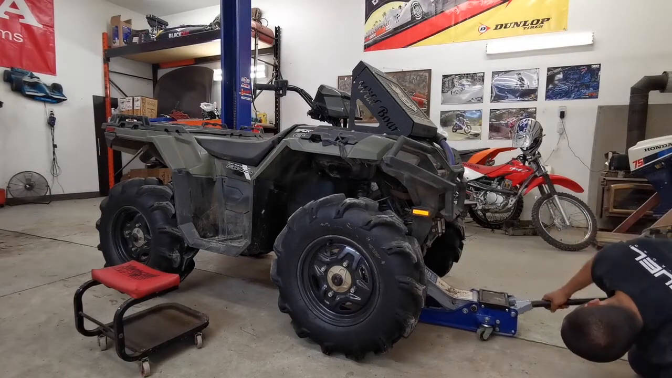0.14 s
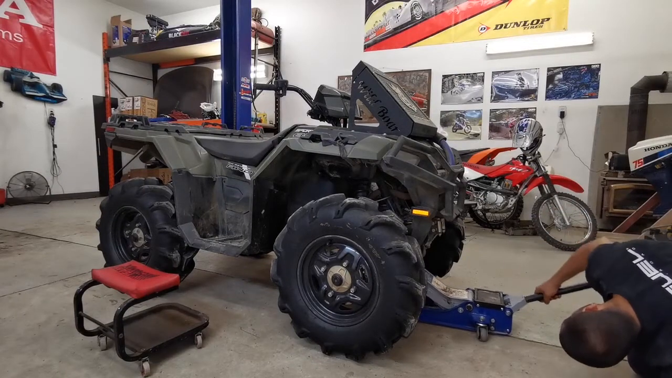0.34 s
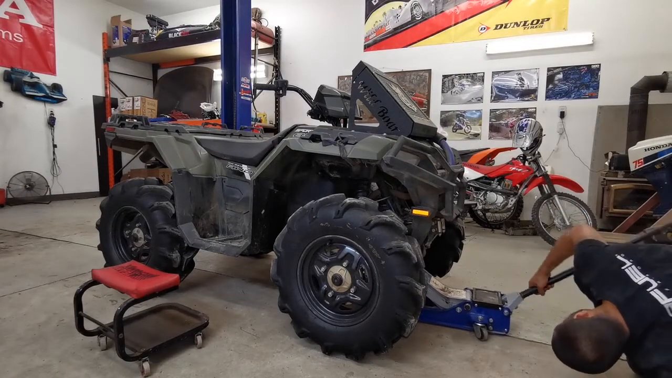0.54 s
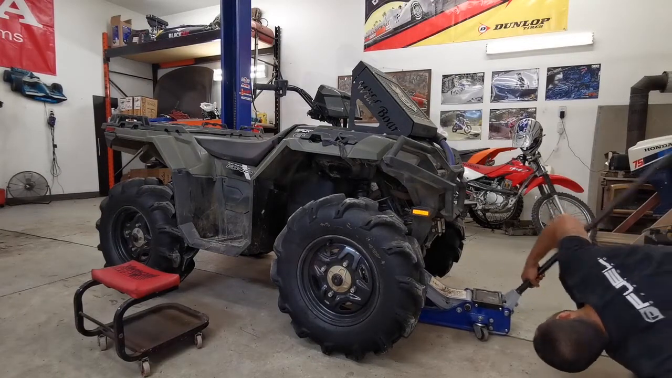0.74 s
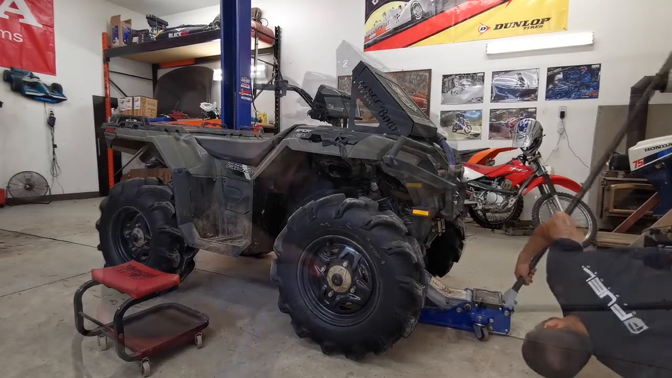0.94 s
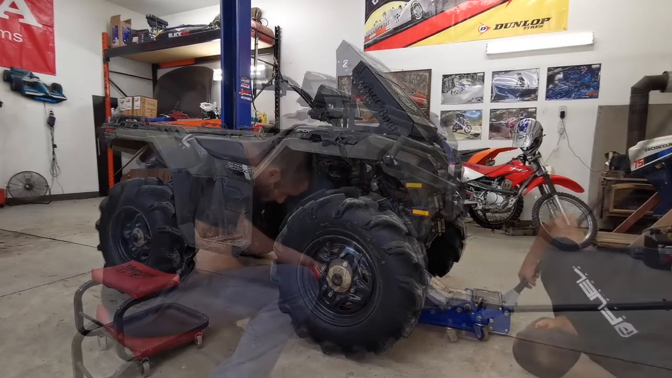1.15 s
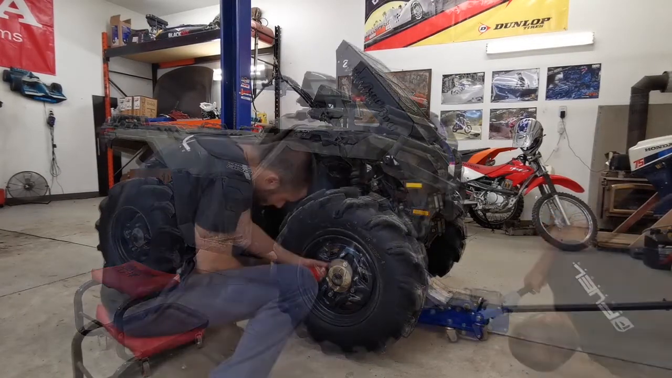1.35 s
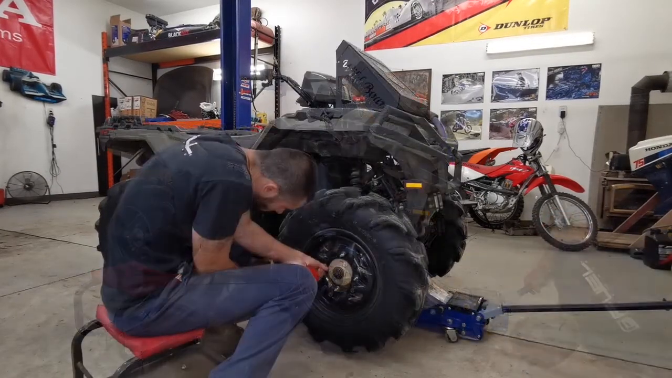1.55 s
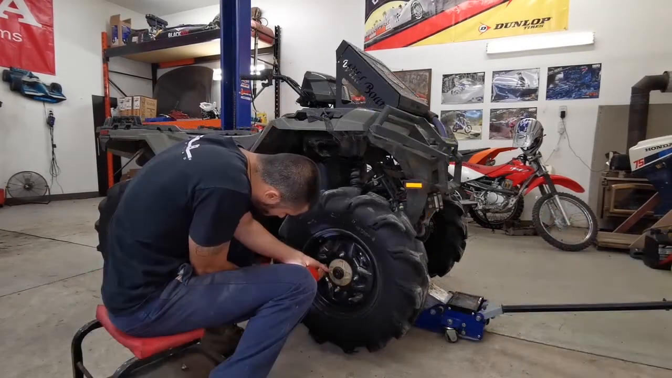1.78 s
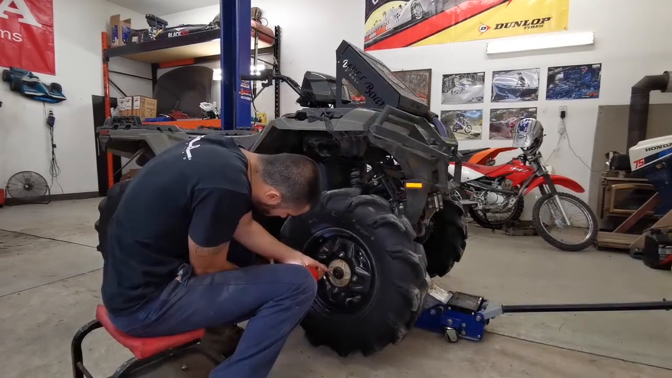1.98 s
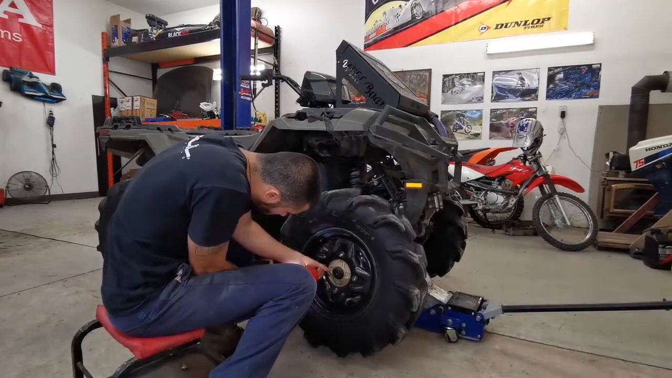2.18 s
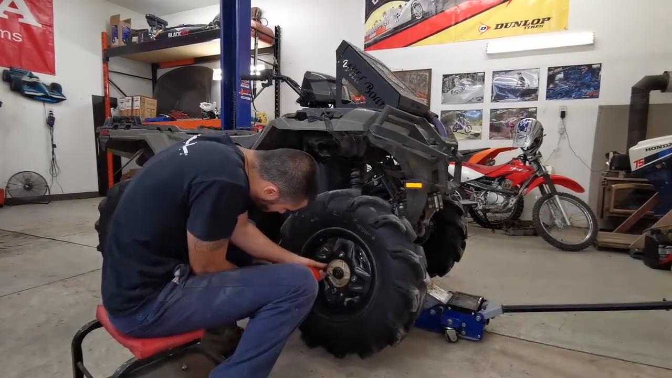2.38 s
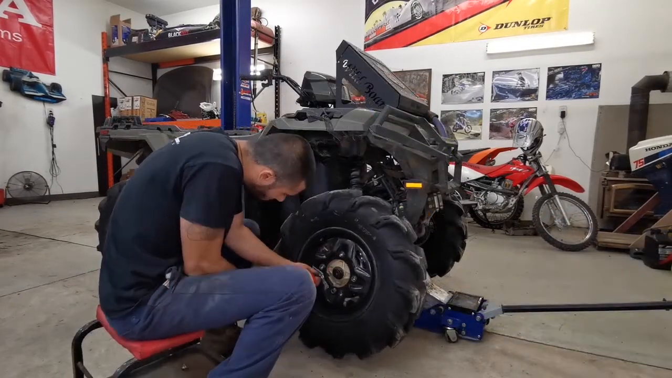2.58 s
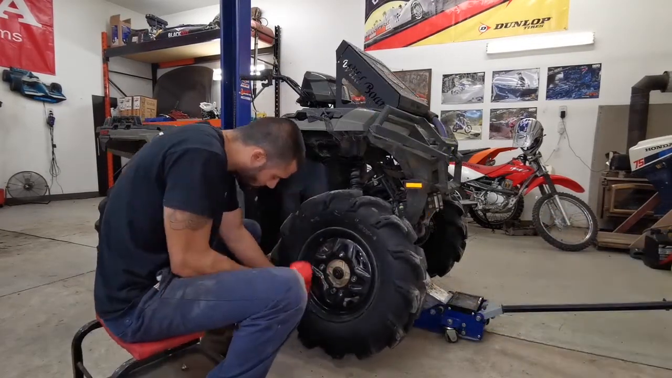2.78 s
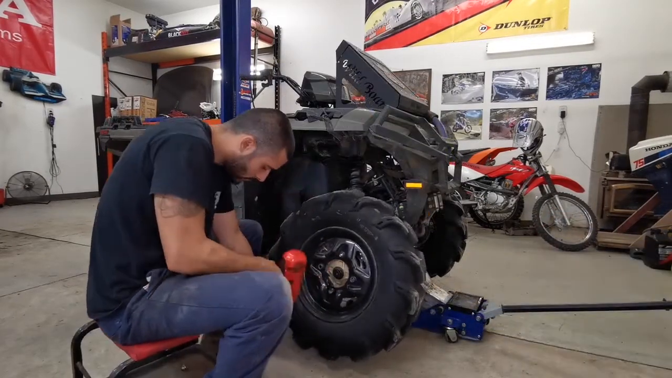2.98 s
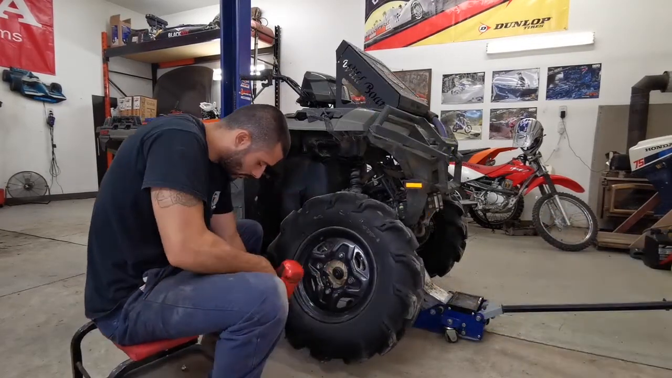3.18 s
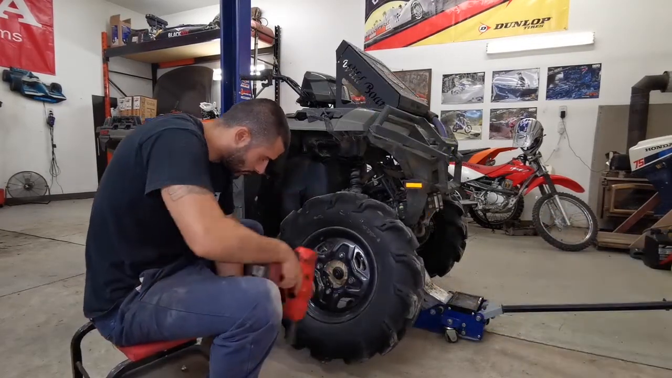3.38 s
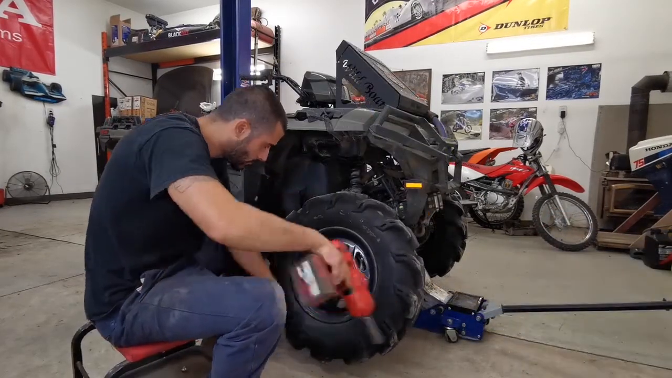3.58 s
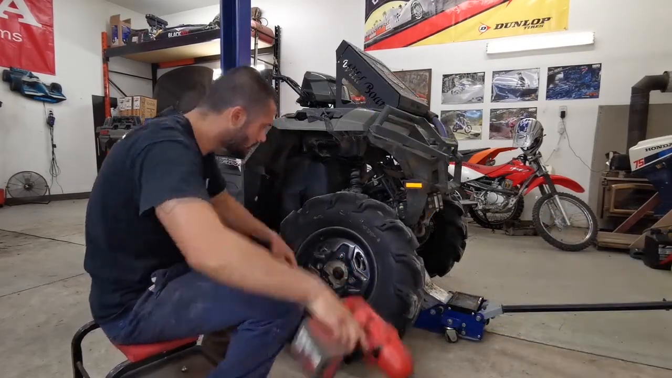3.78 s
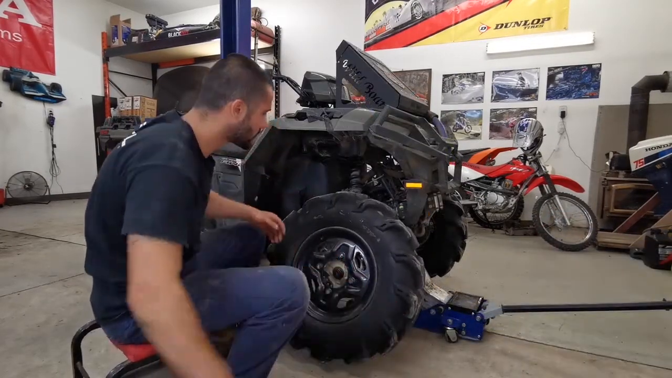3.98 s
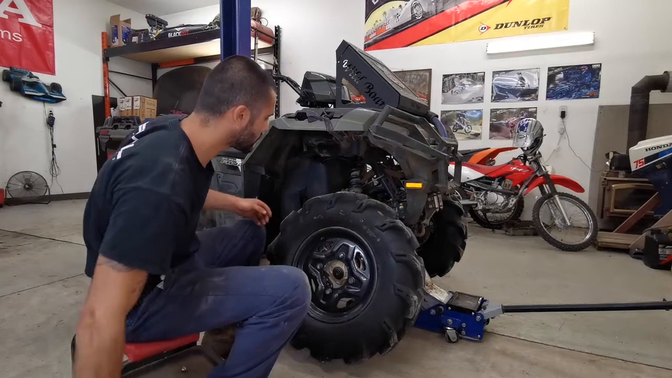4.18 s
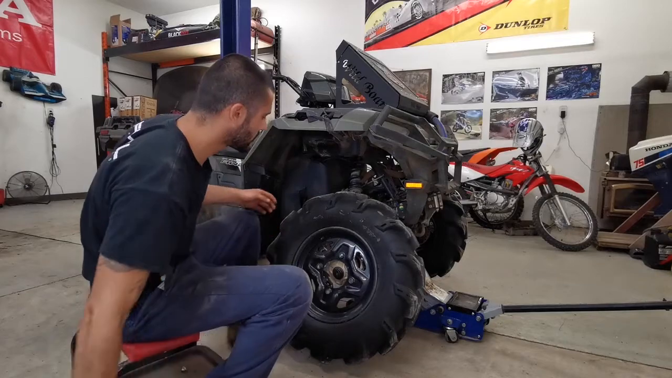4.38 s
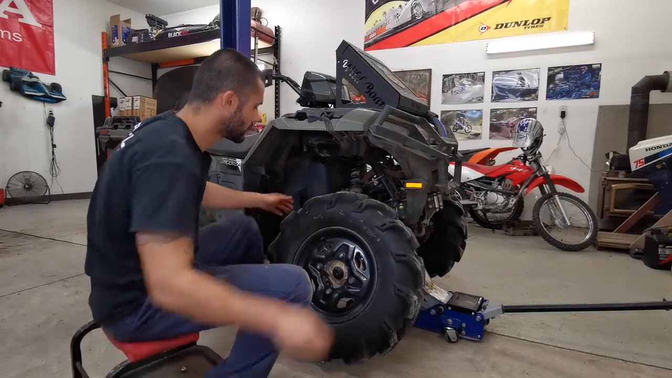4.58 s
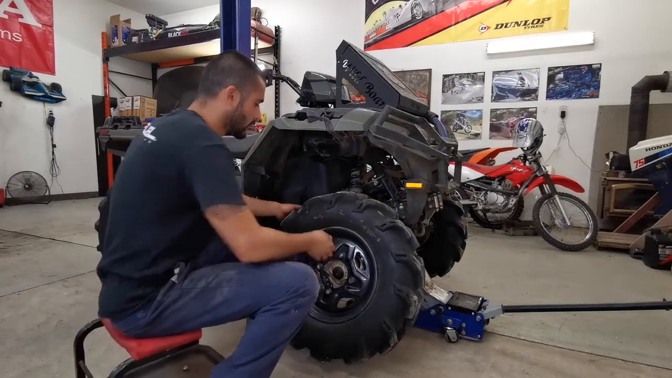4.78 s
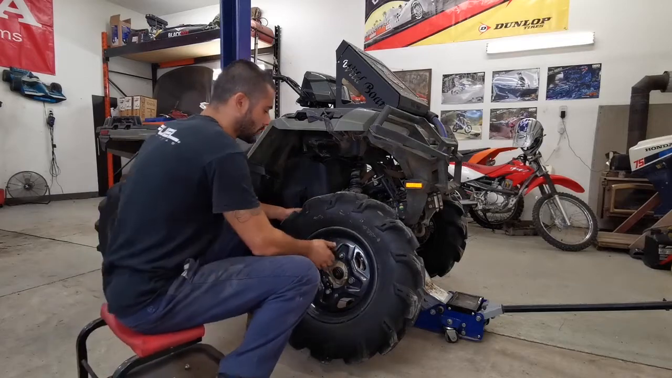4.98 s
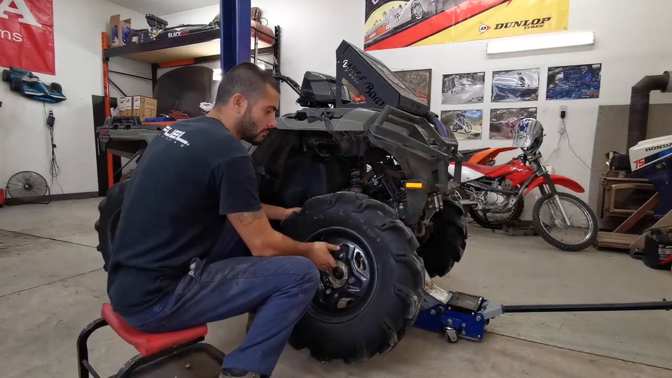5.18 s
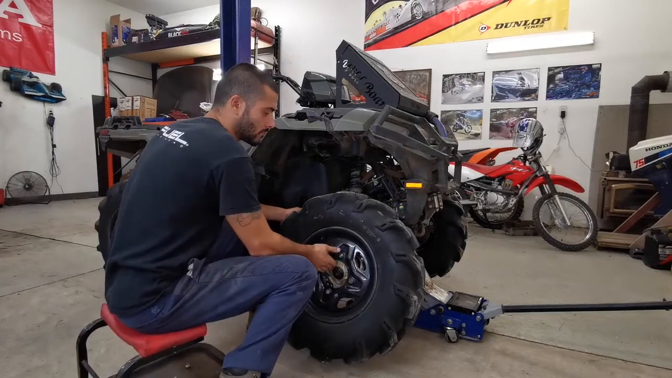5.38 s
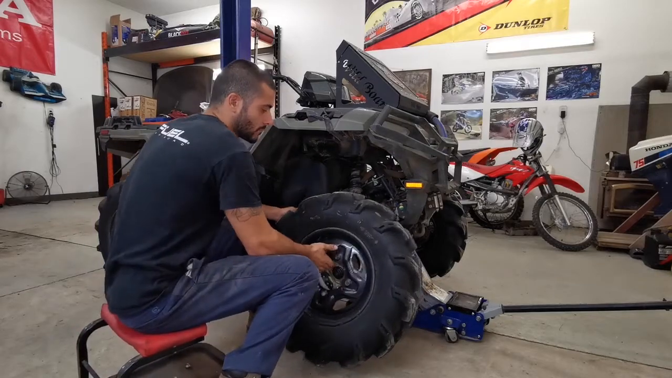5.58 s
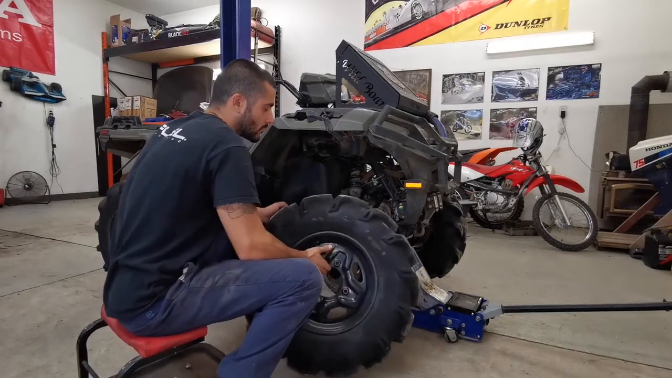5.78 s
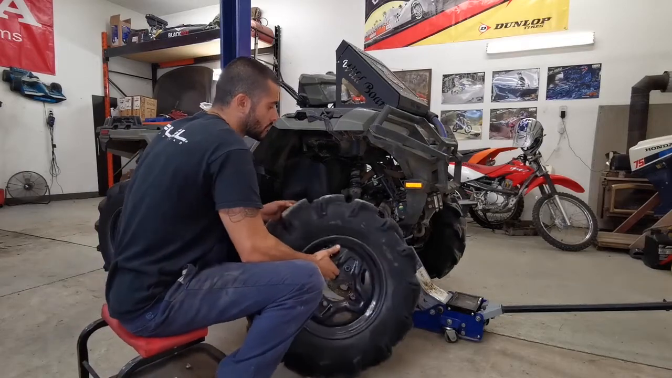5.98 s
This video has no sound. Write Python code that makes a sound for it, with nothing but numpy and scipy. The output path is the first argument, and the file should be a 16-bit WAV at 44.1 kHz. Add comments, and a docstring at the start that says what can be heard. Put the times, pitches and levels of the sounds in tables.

```python
"""A hard-walled garage, with work on a quad bike's wheel. A floor jack's steel handle clanks, rings and
slides home. An impact wrench hammers a lug nut loose and spins it off, motor and gears whining. Socket
and nuts click, the tool is put down, and the wheel is dragged off its studs with a hollow tyre boom.
Each hit is a chatter of contact coloured by the body it strikes; each scrape is catching friction.
A low hum lies underneath, with the shuffling and low thumps of someone moving about."""
import sys
import numpy as np
from scipy import signal
from scipy.fft import rfft, irfft, next_fast_len
from scipy.io import wavfile

SR = 44100
rng = np.random.default_rng(int(sys.argv[2]) if len(sys.argv) > 2 else 0)


def store_wav(level_fs):
    """Save 16-bit WAV to argv[1]."""
    pcm = np.round(np.clip(np.atleast_2d(level_fs), -1, 1) * 32767)
    wavfile.write(sys.argv[1], SR, pcm.T.astype(np.int16))


N = 266584
TIME = np.arange(N) / SR


def gain_of(db):
    """Decibels to amplitude."""
    return 10 ** (np.asarray(db) / 20)


def unit_rms(x):
    """Normalises to an rms of one."""
    return x / np.sqrt(np.mean(x ** 2) + 1e-20)


def curve_at(points, hz):
    """Reads a curve along a log-frequency axis."""
    f, value = np.transpose(points)
    return np.interp(np.log(hz + 1), np.log(f + 1), value)


def add(mix, s, sound):
    """Mixes a sound in at time s."""
    part = mix[..., max(round(s * SR), 0):][..., :sound.shape[-1]]
    part += sound[..., :part.shape[-1]]


def waver(n, per_s):
    """Smooth random modulation of about unit size."""
    knots = rng.standard_normal(int(n / SR * per_s) + 2)
    return np.interp(np.arange(n) / SR * per_s, np.arange(len(knots)), knots)


def routing(direct_db):
    """Gains for a source's two feeds: (direct sound, reverb send at unity)."""
    return gain_of([[direct_db], [0]])


def colour(x, eq, tilt_db=0, size=2048):
    """Minimum-phase EQ, tilted by tilt_db per octave, with its peak at unity."""
    hz = np.fft.rfftfreq(size, 1 / SR)
    db = curve_at(eq, hz) + tilt_db * np.log2(np.maximum(hz, 70))
    log_gain = np.log(gain_of(np.maximum(db - db.max(), -100)))
    log_response = np.conj(signal.hilbert(np.r_[log_gain, log_gain[-2:0:-1]]))
    taps = np.fft.ifft(np.exp(log_response)).real
    return signal.oaconvolve(x, taps)[:len(x)]


def hits(cues, eq, direct_db, modes=(), ring_db=0, ring_direct_db=0):
    """Brief chatters of contact through a body, whose modes, if given, ring on."""
    length_s = max([t60 / 2 for _, _, t60 in modes] + [.15])
    out, t = np.zeros((2, N)), np.arange(int(length_s * SR)) / SR
    ring = sum(gain_of(db - 60 * t / t60) * np.exp(2j * np.pi * (hz * t + rng.random()))
               for hz, db, t60 in modes)
    push = 1. * (t == 0)  # the room blurs the chatter into a single push
    scale = np.sqrt(.01 * SR / len(t))  # level counts the energy as if spread over 10 ms
    for s, db, contact_s, tilt_db in cues:
        envelope = np.exp(-np.minimum(t / contact_s, 50)) * (1 - np.exp(-8 * t / contact_s))
        chatter = rng.choice([-1., 1.], len(t)) * envelope
        hit = routing(direct_db) * [unit_rms(colour(force, eq, tilt_db)) for force in (chatter, push)]
        if modes:
            rung = (ring * np.exp(2j * np.pi * rng.random())).real * np.tanh(t / contact_s)
            hit += routing(ring_direct_db) * gain_of(ring_db) * unit_rms(rung)
        add(out, s, gain_of(db) * scale * hit)
    return out


def scrape(eq, start_s, end_s, db, fade_db_per_s, tilt_db, direct_db, rough_db, catches_per_s=70):
    """A part catches and slips as it slides, ever more lightly."""
    out, t = np.zeros((2, N)), np.arange(0, end_s - start_s, 1 / SR)
    catches = gain_of(rough_db * waver(len(t), catches_per_s))
    friction = unit_rms(colour(rng.standard_normal(len(t)) * catches, eq, tilt_db))
    edge_fades = np.clip(np.minimum(t, t[::-1]) / .006, 0, 1)
    add(out, start_s, routing(direct_db) * gain_of(db - fade_db_per_s * t) * edge_fades * friction)
    return out


# Stereo image (f/Hz, left-right correlation)
CORRELATION = [(30, 0.92), (150, 0.96), (300, 0.88), (600, 0.64), (1200, 0), (16000, 0.047)]


def narrow_bass(x):
    """Makes two unrelated channels alike in the bass, as at two close microphones."""
    size = next_fast_len(x.shape[1], real=True)
    left, other = rfft(x, size)
    shared = np.clip(curve_at(CORRELATION, np.fft.rfftfreq(size, 1 / SR)), 0, 1)
    right = shared * left + np.sqrt(1 - shared ** 2) * other
    return irfft(np.array([left, right]), size)[:, :x.shape[1]]


# The bed: room tone EQ, shuffle EQ and hum lines (f/Hz, relative level/dB)
AIR_EQ = [(20, -7.5), (60, -8.5), (100, -16), (170, 0.5), (250, -7.5), (600, -8.5), (1400, -16.5),
          (2400, -12.5), (3300, -21.5), (6000, -24), (8200, -35), (10600, -28), (12500, -40.5),
          (16000, -41)]
SHUFFLE_EQ = [(20, -24), (50, -4), (110, -4), (170, -4.5), (240, -1), (400, -10), (1000, -5.5),
              (4000, -18.5), (16000, -63)]
HUM_LINES = [(118, -60.5), (157, -74), (237, -58.5), (314, -62.5), (464, -64)]


def room_bed(air_db=-48, hum_trim_db=-2, shuffle_db=-54, unrest_db=3, unrest_per_s=18):
    """Room tone with a wavering hum, and the low uneven shuffle of someone at work."""
    def stereo_noise(eq):
        channels = np.array([colour(rng.standard_normal(N), eq, size=8192) for _ in "LR"])
        return unit_rms(narrow_bass(channels))

    air, shuffle = stereo_noise(AIR_EQ), stereo_noise(SHUFFLE_EQ)
    hum = sum(gain_of(db) * np.sqrt(2) * np.sin(2 * np.pi * hz * TIME + .5 * waver(N, 5.9))
              for hz, db in HUM_LINES)
    shuffle *= gain_of(shuffle_db + unrest_db * waver(N, unrest_per_s))
    return gain_of(air_db) * air + gain_of(hum_trim_db) * hum + shuffle


# Jack cues: pivot clacks and handle clank (t/s, level/dB, contact/s, tilt/dB per octave)
PIVOT_CLACKS = [(0.3180, -26, 0.002, 0.5), (0.3890, -23, 0.0051, 10)]
HANDLE_CLANK = [(0.3925, -21, 0.0087, -1.5)]
# Body tone of pivot and handle (f/Hz, level/dB)
PIVOT_EQ = [(180, -49), (300, -30), (455, -1), (667, -21), (1040, 2.5), (1280, -17), (1900, -1.5),
            (2570, -10.5), (4300, -5), (6850, -21), (7690, -35), (10900, -32.5), (16000, -68)]
HANDLE_EQ = [(88, -26), (150, -30), (197, -27), (231, -10), (270, -33.5), (466, -15), (675, -10.5),
             (1450, -6.5), (1630, -4.5), (1790, 0), (3490, -12), (5050, -14), (10800, -34), (16000, -61)]
# Long ring of the steel handle (f/Hz, level/dB, t60/s)
HANDLE_MODES = [(237, -20, 1.5), (464, -2, .4), (604, -6, .7), (942, -5, .4), (1438, 1, .8), (1715, -4, .4),
                (1805, -3, .8), (1841, -5, .8), (2133, -6, .4), (2364, -2, 1.2), (2583, -6, .4),
                (2972, -9, .7), (4210, -8, .6), (4667, -8, .6), (4936, -7, .55)]


def floor_jack():
    """The pivot clacks, then the steel handle clanks, rings and slides home."""
    clacks = hits(PIVOT_CLACKS, PIVOT_EQ, direct_db=-13)
    clank = hits(HANDLE_CLANK, HANDLE_EQ, direct_db=-5.5,
                 modes=HANDLE_MODES, ring_db=-10.5, ring_direct_db=12)
    slide = scrape(HANDLE_EQ, start_s=.405, end_s=.76, db=-36, fade_db_per_s=37,
                   tilt_db=-1.4, direct_db=1.5, rough_db=6.5)
    return clacks + clank + slide


# Lug nut cues (t/s, level/dB, contact/s, tilt/dB per octave)
NUT_CLINKS = [(1.356, -43.5, 0.0028, -2), (1.3765, -39.5, 0.0018, -2), (1.4784, -32.5, 0.0023, -3.5),
              (1.5158, -41.5, 0.0015, -0.5), (4.4290, -32.5, 0.0024, -.5), (4.7715, -37.5, 0.0029, 5),
              (4.7758, -23.5, 0.00069, 0.7), (5.773, -55, 0.0021, 5)]
# Nut on rim: attack tone (f/Hz, level/dB) and ring (f/Hz, level/dB, t60/s)
NUT_EQ = [(120, -49), (200, -24), (316, -1), (401, -31.5), (509, -21), (623, -4.5), (1060, -9.5), (2800, 3),
          (4600, -9), (8580, -16), (10900, -13.5), (12200, -26), (14900, -24), (16000, -24)]
NUT_MODES = [(421, -3.5, 0.12), (2030, 2, 0.081), (2305, -0.5, 0.17), (2600, 0, 0.15), (2750, -12, 0.19)]


def lug_nuts():
    """Lug nuts clink against the rim with a short ring."""
    return hits(NUT_CLINKS, NUT_EQ, direct_db=-6, modes=NUT_MODES, ring_db=-8.5, ring_direct_db=-3)


# Low thumps of someone moving about (2.8 to 3.28 s), and bumps on the wheel
# (t/s, level/dB, contact/s, tilt/dB per octave)
THUMPS_AND_BUMPS = [(1.472, -45, 0.0047, -8), (2.80, -36.5, 0.052, -6.5), (2.878, -42, 0.0055, 4),
                    (3.28, -35, 0.029, -4), (5.775, -33.5, 0.01, -3.5), (5.881, -22, 0.01, 0.5)]
# Wheel tone (f/Hz, level/dB) and tyre boom (f/Hz, level/dB, t60/s); the thumps share both
WHEEL_EQ = [(29, -51), (50, -17.5), (189, -4), (353, -6), (398, -14), (678, -6), (884, -9.5), (1540, -18.5),
            (2440, -11), (2750, -20), (6390, -24), (8340, -31.5), (10600, -26.5), (16000, -55.5)]
TYRE_MODES = [(156, 11, 0.14), (220, -7, 0.54), (266, -6, .25), (323, 9, 0.25)]


def thumps_and_wheel():
    """Low thumps of someone moving about, wheel bumps with a hollow tyre boom, rim dragging on studs."""
    low_hits = hits(THUMPS_AND_BUMPS, WHEEL_EQ, direct_db=-4.5,
                    modes=TYRE_MODES, ring_db=-5.5, ring_direct_db=-10)
    drag = scrape(WHEEL_EQ, start_s=5.892, end_s=6.05, db=-30.5, fade_db_per_s=54,
                  tilt_db=-.5, direct_db=-.5, rough_db=5)
    return low_hits + drag


# Wrench timing: trigger pulled, nut loose, nut off the thread, trigger let go
TRIGGER_S, LOOSE_S, FREE_S, RELEASE_S = 1.78, 1.97, 2.24, 2.63


def run_envelope(threaded_db, free_db, fade_db_per_s, attack_s=.045, freeing_s=.018):
    """A wrench voice opens on the trigger, steps up as the nut comes free and dies after release."""
    attack = np.clip((TIME - TRIGGER_S) / attack_s, 0, 1)
    free = np.clip((TIME - FREE_S) / freeing_s + .5, 0, 1)
    fade_db = fade_db_per_s * np.maximum(TIME - RELEASE_S, 0)
    return attack * gain_of(threaded_db + (free_db - threaded_db) * free - fade_db)


# Motor and gear partials (multiple of the whine pitch, level/dB, flutter as a share of pitch)
WHINE_PARTIALS = [(.547, -7, .018), (1, 0, .004), (1.52, -11, .005), (2, -7, .003), (2.52, -9, .01),
                  (3, -14, .004), (4, -9, .005)]
# Rasp of gears and rattling nut (f/Hz, level/dB)
RASP_EQ = [(200, -29), (1000, -16.5), (1500, -13.5), (2500, -13), (4000, -11), (5200, -14), (6700, -11),
           (8300, -22), (10700, -11), (12500, -30), (15000, -45)]


def wrench_spin(motor_hz=2600, creep_hz_per_s=130, sag_hz=250, spin_up_s=.085, strain_db=8,
                wobble_share=.00187, wobble_db=3, wobble_per_s=32):
    """Motor and gears whine up as the load falls away; the loose nut rattles in the wobbling socket."""
    loose_for_s = np.maximum(TIME - LOOSE_S, 0)
    load = np.exp(-loose_for_s / spin_up_s)
    pitch_hz = motor_hz + creep_hz_per_s * loose_for_s - sag_hz * load
    pitch_hz *= 1 + wobble_share * waver(N, wobble_per_s)
    motor = run_envelope(threaded_db=-35, free_db=-29, fade_db_per_s=140)
    gears = run_envelope(threaded_db=-41, free_db=-38.5, fade_db_per_s=115)
    whine = np.zeros(N)
    for multiple, db, flutter in WHINE_PARTIALS:
        level = gain_of(db + wobble_db * waver(N, wobble_per_s)) * (motor if multiple == 1 else gears)
        hz = multiple * pitch_hz * (1 + flutter * waver(N, per_s=250))
        whine += (1 - load) * level * np.sin(2 * np.pi * np.cumsum(hz) / SR)
    strain = load * np.clip((TIME - TRIGGER_S) / (LOOSE_S - TRIGGER_S), 0, 1)  # peaks as the nut gives
    rattle = rng.standard_normal(N) * np.exp(.47 * waver(N, per_s=150))
    rasp = unit_rms(colour(rattle, RASP_EQ)) * gain_of(strain_db * strain)
    rasp *= run_envelope(threaded_db=-35.5, free_db=-33, fade_db_per_s=190)
    return routing(direct_db=7) * whine + routing(direct_db=-4) * rasp


# Socket cues (t/s, level/dB, contact/s, tilt/dB per octave) and body tone (f/Hz, level/dB)
SOCKET_CLICKS = [(1.783, -31, 0.002, -3), (1.832, -14.5, 0.004, 0.5), (2.600, -25.5, .014, 1.5),
                 (2.882, -32, 0.0031, 0.5), (2.9068, -16.5, 0.001, 6), (3.3388, -17.5, 0.00036, 5),
                 (3.3412, -20.5, 0.002, 9), (3.408, -38, .004, -5)]
SOCKET_EQ = [(70, -39), (180, -13), (300, 8), (519, -30), (584, -2.5), (774, -1), (961, 4.5), (1660, 2),
             (2400, 6.5), (2980, -1.5), (6740, -9), (8360, -16.5), (10600, -6), (14000, -24.5),
             (16000, -19.5)]


def socket():
    """The socket clicks on nut and stud."""
    return hits(SOCKET_CLICKS, SOCKET_EQ, direct_db=-2)


# Crack of the hammer (f/Hz, level/dB) and ring of anvil and socket (f/Hz, level/dB, t60/s)
HAMMER_EQ = [(180, -63), (300, -36), (440, -20.5), (486, -19.5), (994, -20.5), (1280, -14.5), (1610, -11),
             (2740, 3), (3130, -3.5), (4160, 0), (8220, -9.5), (10700, 3), (12300, -9), (16000, -20)]
ANVIL_MODES = [(3623, -7, .4), (3688, -6, .4), (4070, -4, .3), (4172, 0, .35), (4277, -4, .4),
               (4380, -5, .4), (4550, -3, .4), (4753, 0, .35), (4890, -6, .4), (5603, -8, .4),
               (8937, -10, .3), (10180, -9, .25)]


def wrench_hammer(start_s=1.811, per_s=34.1, count=6, contact_s=.0034,
                  slack_db=-18, slack_tilt_db=-4.5, full_db=-9, ease_db=-1.2, tilt_db=-.4):
    """A dull first blow takes up slack; the rest land evenly, lighter each time as the nut gives."""
    cues = [(start_s, slack_db, contact_s, slack_tilt_db)]
    cues += [(start_s + k / per_s, full_db + ease_db * (k - 1), contact_s, tilt_db)
             for k in range(1, count)]
    return hits(cues, HAMMER_EQ, direct_db=4, modes=ANVIL_MODES, ring_db=-13.5, ring_direct_db=6)


# Wrench housing cues (t/s, level/dB, contact/s, tilt/dB per octave) and body tone (f/Hz, level/dB)
HOUSING_KNOCKS = [(3.3135, -31, 0.0016, 4), (3.326, -29.5, 0.013, 5), (3.662, -27.5, 0.0012, 2),
                  (3.678, -30, 0.0065, -4), (4.012, -42, .004, 2)]
HOUSING_EQ = [(71, -65), (120, -25.5), (529, -2.5), (583, -7.5), (840, -6.5), (1960, -22), (2420, -18),
              (3000, -25.5), (4410, -27), (10700, -48.5), (12000, -44.5), (15600, -76), (22000, -120)]


def wrench_put_down():
    """The housing knocks as the wrench is pulled away and put down, then skids to rest."""
    knocks = hits(HOUSING_KNOCKS, HOUSING_EQ, direct_db=-2)
    skid = scrape(HOUSING_EQ, start_s=3.69, end_s=4.07, db=-35.5, fade_db_per_s=28.5,
                  tilt_db=-1.5, direct_db=-8.5, rough_db=3.5)
    return knocks + skid


# Reverb decay of the bare walls (f/Hz, t60/s)
GARAGE_DECAY = [(100, 1.4), (250, 0.75), (550, 1), (1400, 1.05), (2600, 1.135), (5000, 1.07), (10000, 0.7),
                (16000, 0.38)]


def garage(direct, send, early_db, early_s, build_s=.0016):
    """Direct sound, quick reflections off floor and vehicle, then the long tail of bare walls."""
    t = np.arange(int(1.5 * SR)) / SR

    def echoes(density):
        return narrow_bass(rng.standard_normal((2, len(t))) * (rng.random((2, len(t))) < density))

    tail_density = 5000 / SR + t  # echoes thicken with time
    hz, when, bands = signal.stft(echoes(tail_density) / np.sqrt(tail_density), SR, nperseg=256)
    decay = gain_of(-60 * when / curve_at(GARAGE_DECAY, hz)[:, None])
    tail = signal.istft(bands * decay, SR, nperseg=256)[1][:, :len(t)]
    tail = unit_rms(tail * (1 - np.exp(-t / build_s))) / np.sqrt(len(t))
    early = gain_of(early_db) * unit_rms(echoes(2000 / SR) * np.exp(-t / early_s)) / np.sqrt(len(t))
    reflections = signal.oaconvolve(direct[None], early, axes=1)[:, :N]
    reverb = signal.oaconvolve(send[None], tail, axes=1)[:, :N]
    arrival = np.array([direct, np.roll(direct, 9)])  # reaches the left microphone first
    return arrival + reflections + reverb


def scene(dip_db=-12.5, dip_times_s=(.86, 1.2, 1.35, 1.5)):
    """Three buses, each with its own reflections; jack and bed dip briefly before the wheel work."""
    jack_bus = floor_jack()
    wrench_bus = wrench_hammer() + wrench_spin() + socket()
    handling_bus = lug_nuts() + wrench_put_down() + thumps_and_wheel()
    dip = gain_of(np.interp(TIME, dip_times_s, [0, dip_db, dip_db, 0]))
    return (dip * (garage(*jack_bus, early_db=5, early_s=.016) + room_bed())
            + garage(*wrench_bus, early_db=-3.5, early_s=.034)
            + garage(*handling_bus, early_db=-5.5, early_s=.005))


def gain_control(x, threshold_db=-14, share=.55, recovery_db_per_s=38, attack_s=.003):
    """Sharp peaks slip through, then duck everything for a few tenths of a second."""
    edge_db = 20 * np.log10(abs(np.diff(x, prepend=0)).max(0) + 1e-9)  # treble-weighted sidechain
    over_db = np.maximum(edge_db - threshold_db, 0)
    recovery_db = TIME * recovery_db_per_s
    duck_db = np.maximum.accumulate(share * over_db + recovery_db) - recovery_db
    pole = np.exp(-1 / (attack_s * SR))
    return x / gain_of(signal.lfilter([1 - pole], [1, -pole], duck_db))


# Balance of the two microphone ports (f/Hz, left minus right level/dB)
PORT_BALANCE = [(100, 0), (380, -4.5), (900, -5.5), (2600, -7), (3600, -2), (5000, 2), (7000, 7),
                (8300, 3.5), (9600, -15), (10800, -10.5), (12500, -11), (14000, -5), (16000, 24)]


def record(dry, cutoff_hz=16100):
    """Each microphone port adds its own colour; then gain control, soft clipping and a low-pass."""
    size = next_fast_len(N + 4096)
    ratio = gain_of(curve_at(PORT_BALANCE, np.fft.rfftfreq(size, 1 / SR)))
    ports = np.array([ratio, np.ones_like(ratio)]) * np.sqrt(2 / (1 + ratio ** 2))  # constant power
    coloured = irfft(rfft(dry, size) * ports, size)[:, :N]
    clipped = np.tanh(gain_control(coloured))
    low_pass = signal.firwin(255, cutoff_hz, window=("kaiser", 9), fs=SR)
    return signal.oaconvolve(clipped, low_pass[None], "same")


dry = scene()
out = record(dry)
store_wav(out)
```